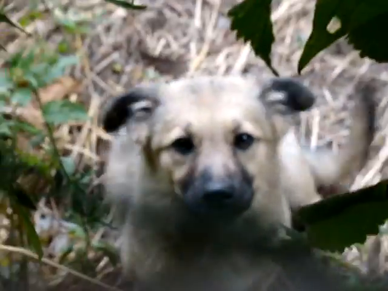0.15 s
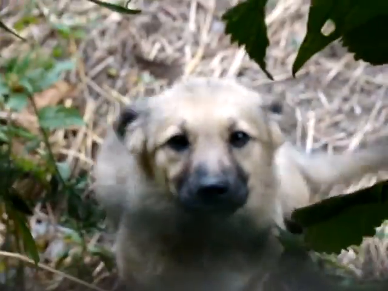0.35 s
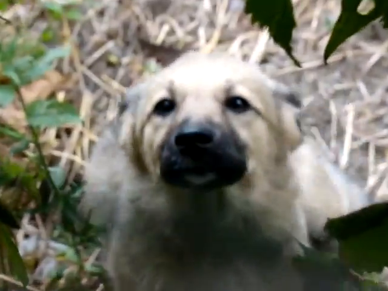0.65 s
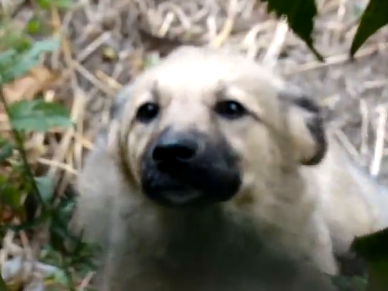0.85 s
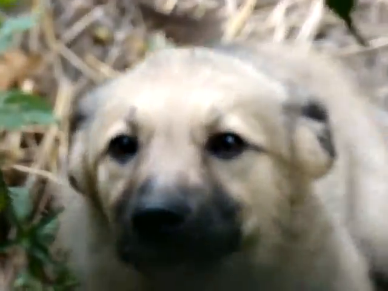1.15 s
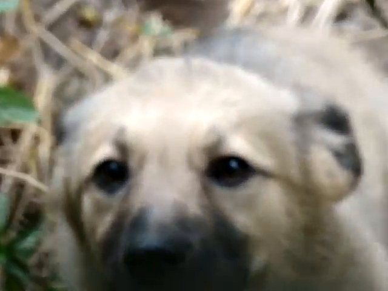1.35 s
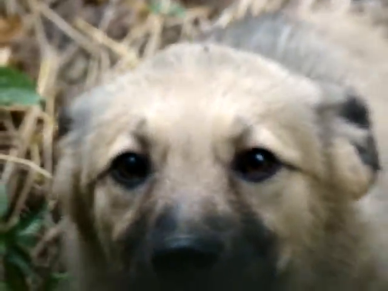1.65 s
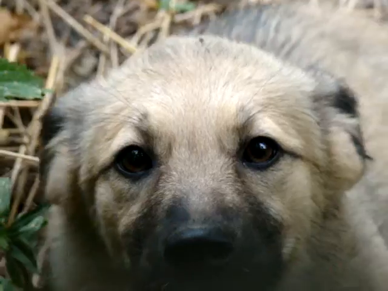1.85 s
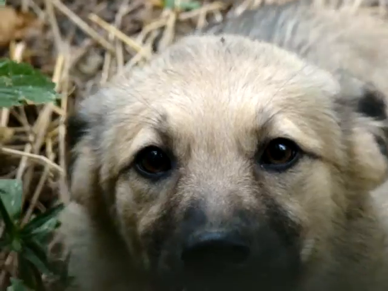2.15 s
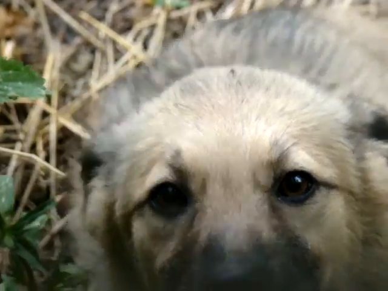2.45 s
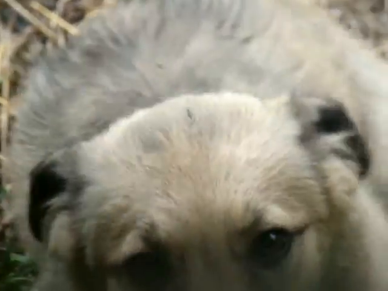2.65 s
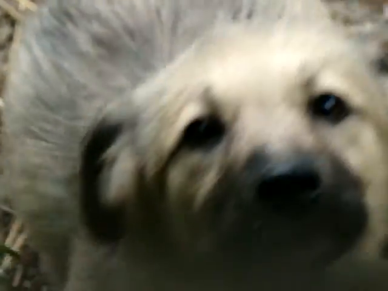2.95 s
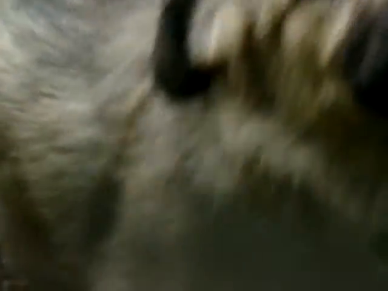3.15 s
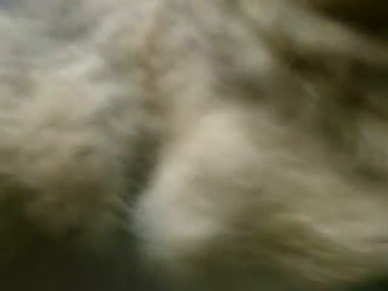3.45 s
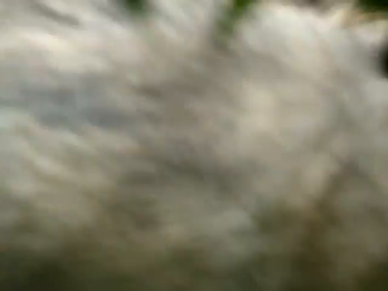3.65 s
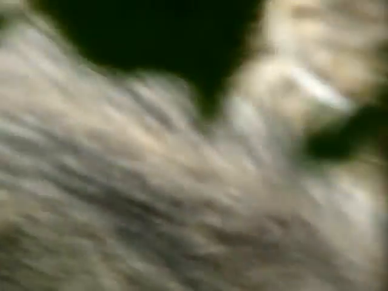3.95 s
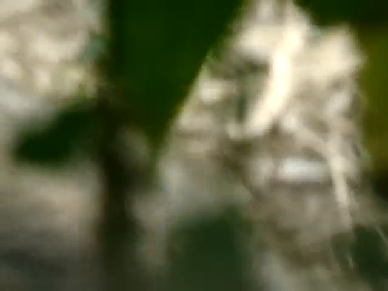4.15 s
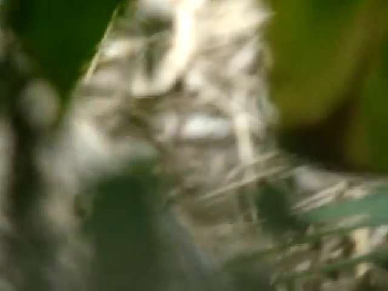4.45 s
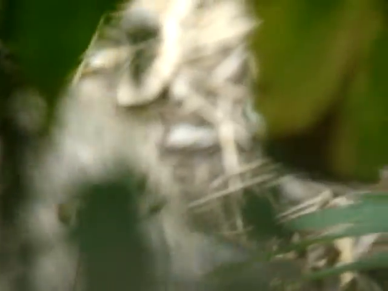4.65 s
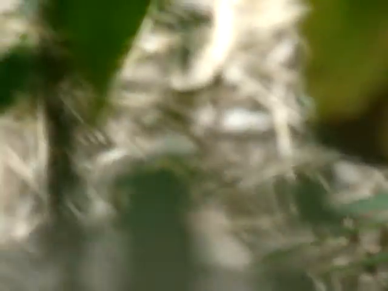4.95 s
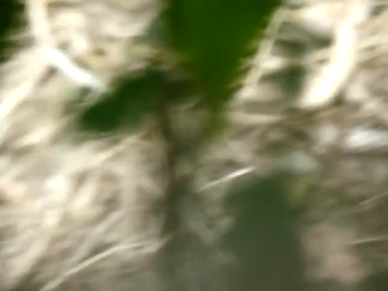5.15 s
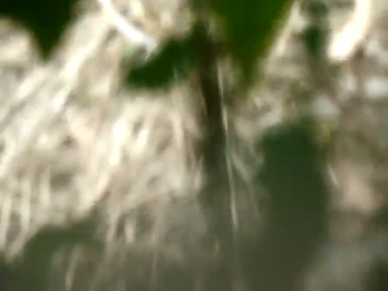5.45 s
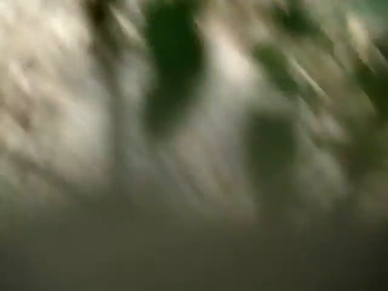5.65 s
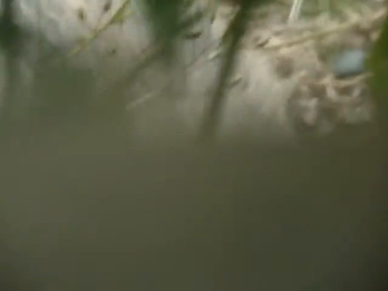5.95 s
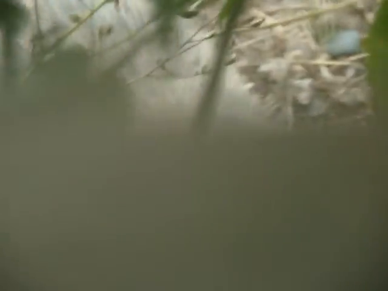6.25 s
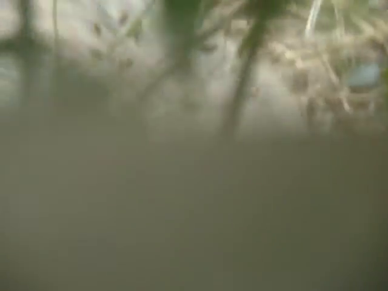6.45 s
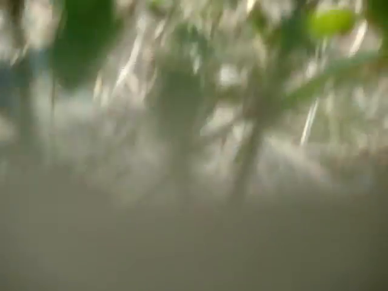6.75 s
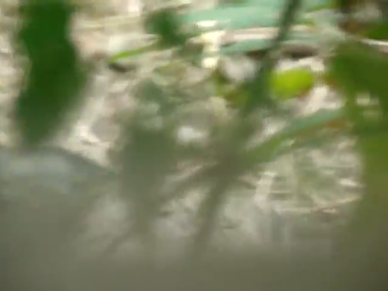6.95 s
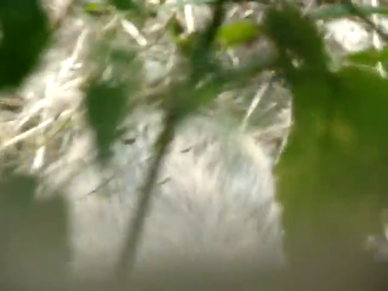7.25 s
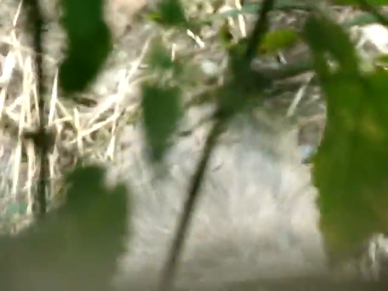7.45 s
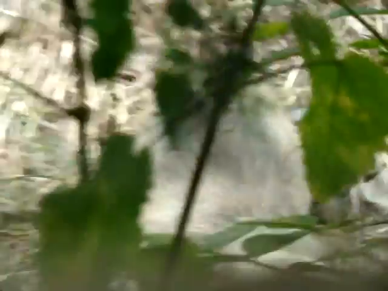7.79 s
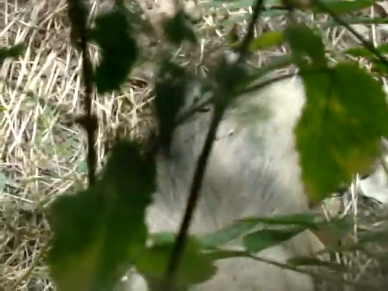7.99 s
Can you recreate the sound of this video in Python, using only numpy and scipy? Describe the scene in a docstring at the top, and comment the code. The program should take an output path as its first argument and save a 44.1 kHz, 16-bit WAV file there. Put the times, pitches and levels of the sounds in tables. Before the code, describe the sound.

A puppy whimpers in thin, very high nose whistles, then a brief voiced whine, amid knocks, dry straw crackle, far chirps and soft hiss.

```python
"""Outdoors, a hand-held microphone close to a puppy in dry straw under low bushes.
Coloured noise gives a soft hiss and rush; damped tones and noise bursts give knocks and straw crackles.
Far birds chirp in sliding tones. From about one second thin nose whistles beat, fray and break over air noise.
After three seconds they drop into a voiced whine of harmonics, with dull rustles from here on.
Knocks, straw and chirps carry on to the end, where a faint distant tone sounds once."""
import sys
import numpy as np
from scipy import signal
from scipy.fft import rfft, irfft
from scipy.io import wavfile
from scipy.ndimage import uniform_filter1d

SR = 44100
rng = np.random.default_rng(int(sys.argv[2]) if len(sys.argv) > 2 else 0)


def int16_out(signal):
    """Quantize to a 16-bit WAV file."""
    q = np.round(np.clip(np.atleast_2d(signal).T, -1, 1) * 32767)
    wavfile.write(sys.argv[1], SR, q.astype(np.int16))


N = 358091
TIME = np.arange(N) / SR


def from_db(db):
    """Decibels to gain."""
    return 10 ** (np.asarray(db) / 20)


def rms_one(x):
    """Scale to unit rms."""
    return x / np.sqrt(np.mean(x ** 2) + 1e-20)


def read(rows, t):
    """Each column of a curve at the times t."""
    s, *columns = np.transpose(rows)
    return [np.interp(t, s, column) for column in columns]


def add(out, s, sound):
    """Mix a sound in from time s."""
    i = max(0, int(s * SR))
    out[i:i + len(sound)] += sound[:max(0, N - i)]


def lowpass(x, order, cutoff_hz):
    """Causal low-pass."""
    return signal.sosfilt(signal.butter(order, cutoff_hz, fs=SR, output="sos"), x)


def band(x, low_hz, high_hz):
    """Causal band-pass."""
    edges_hz = [low_hz, min(high_hz, .45 * SR)]
    return signal.sosfilt(signal.butter(2, edges_hz, "band", fs=SR, output="sos"), x)


def wander(rate_hz, size):
    """Smooth random drift of about unit spread, no faster than the rate."""
    slow = lowpass(rng.standard_normal(size + SR), 2, rate_hz)
    return rms_one(slow[SR // 2:])[-size:]   # the filter's start-up is dropped


def noise(spectrum, size):
    """Noise of a given colour, rms 1, falling away below its first frequency."""
    hz, db = np.transpose(spectrum)
    f = np.maximum(np.fft.rfftfreq(size, 1 / SR), 1)
    gain = from_db(np.interp(np.log(f), np.log(hz), db))
    gain = gain * np.minimum(f / hz[0], 1) ** 2
    return rms_one(irfft(rfft(rng.standard_normal(size)) * gain, size))


def turn(hz):
    """Running phase of a moving frequency."""
    return 2 * np.pi * np.cumsum(hz) / SR


def gate(t, edge_s):
    """Opens at the start of t and shuts at its end."""
    return np.clip(np.minimum(t - t[0], t[-1] - t) / edge_s, 0, 1)


def soften(x, length_s):
    """Round the corners of a control."""
    return uniform_filter1d(x, max(1, int(length_s * SR)), mode="nearest")


def haze(phase, width_hz):
    """A narrow band of noise that follows a moving tone; as strong as a unit sine."""
    in_step = wander(width_hz / 2, len(phase)) * np.sin(phase)
    quarter_off = wander(width_hz / 2, len(phase)) * np.cos(phase)
    return (in_step + quarter_off) / np.sqrt(2)


# Colour of the open air around the microphone. Each row: frequency in Hz, relative density in dB per Hz.
OUTDOOR_COLOUR = [(55, -16.5), (100, -18), (135, -11.5), (230, -4), (1190, -7.5), (1990, -10.5), (3240, -1),
                  (4670, -2.5), (5600, -7.5), (10200, -16.5), (13300, -59)]


def outdoors(split_hz=2200, rush_db=-52.5, hiss_db=-52):
    """A low distant rush and the slightly flickering hiss of leaves, split from one coloured noise."""
    air = noise(OUTDOOR_COLOUR, N)
    low = signal.sosfiltfilt(signal.butter(3, split_hz, fs=SR, output="sos"), air)
    flicker_db = .8 * wander(12, N)
    rush = rms_one(low) * from_db(rush_db)
    hiss = rms_one(air - low) * from_db(hiss_db + flicker_db)
    return rush + hiss


# Colour of dry straw, close by. Each row: frequency in Hz, relative density in dB per Hz.
STRAW_COLOUR = [(1500, -18.5), (4500, -4.5), (6000, -6.5), (8000, 4), (10000, -5.5)]
# Fine crackle of straw around the puppy. Each row: time in seconds, level in dB.
STIRRING_LEVEL = [(.65, -59), (.8, -54), (2.15, -60), (2.3, -53), (5.05, -54), (5.6, -56), (6.4, -70),
                  (6.6, -55), (8.1, -56.5)]


def stirring_straw(grain_db=3, spurt_db=3):
    """Fine stalks crackle in small spurts as the puppy shifts about: noise of grainy level."""
    level_db, = read(STIRRING_LEVEL, TIME)
    ragged_db = grain_db * wander(500, N) + spurt_db * wander(22, N)
    return from_db(level_db) * rms_one(noise(STRAW_COLOUR, N) * from_db(ragged_db))


# Knocks of twigs and fingers close to the microphone. Each row: start in seconds, body peak in dB,
# body pitch in Hz, crack peak in dB, looseness from 0 to 1.
KNOCK_EVENTS = [(0.013, -30.5, 900, -28.5, 1), (0.1365, -30, 460, -68, 0.6), (0.311, -28.5, 525, -54, 0.86),
                (0.4, -25, 1480, -18.5, 1), (0.547, -31.5, 666, -32.5, 0.65),
                (0.6863, -33.5, 432, -36, 0.9), (3.097, -33.5, 400, -42, 0.95),
                (4.0505, -32, 435, -26, 0.7), (4.112, -35.5, 402, -40, 0.37),
                (4.15, -34.5, 390, -32.5, 0.63), (4.356, -32.5, 385, -32, 0.75),
                (4.428, -31.5, 1490, -29, 0.8), (4.8502, -29.5, 1500, -18, 1), (5.256, -33, 620, -42, 0.4),
                (7.0115, -28.5, 1250, -24.5, 0.1), (7.0146, -29.5, 766, -45, 0.75),
                (7.3801, -19, 850, -29, 0.53), (7.3828, -28, 900, -30.5, 0.53),
                (7.7864, -32.5, 706, -43, 0.4), (7.852, -27.5, 720, -32, 0.35),
                (7.894, -31.5, 676, -50, 0.4), (8.057, -32, 746, -46, 0.34)]
# Colour of a twig's crack. Each row: frequency in Hz, relative density in dB per Hz.
TWIG_COLOUR = [(2800, -12), (4700, 5.5), (6000, -7.5), (8000, -3), (10000, -6.5)]
# the duller and looser a knock, the more it thumps the microphone housing
THUMP_HZ, THUMP_S, THUMP_SHARE, SOFT_BODY_HZ = 255, 0.0085, 0.4, 420
THUMP_BAND_HZ = 140, 410


def knocks(cycles=1.0, grit=0.67, tail_s=0.0092, tail_share=0.38, crack_s=0.0038):
    """A blow swings a heavily damped body about once and rattles if it is loose, under a bright crack."""
    out, t = np.zeros(N), np.arange(SR // 20) / SR
    thump = band(np.sin(2 * np.pi * THUMP_HZ * t) * np.exp(-t / THUMP_S), *THUMP_BAND_HZ)
    for s, body_db, hz, crack_db, loose in KNOCK_EVENTS:
        rattle = loose * rms_one(band(rng.standard_normal(len(t)), .5 * hz, 3 * hz))
        swing = (np.sin(2 * np.pi * hz * t) + grit * rattle) * np.exp(-t * hz / cycles)
        rattling_tail = tail_share * rattle * np.exp(-t / tail_s)
        body = band(swing + rattling_tail, .5 * hz, 2170)
        body = body / np.abs(body).max() + THUMP_SHARE * loose * (SOFT_BODY_HZ / hz) ** 2 * thump
        crack = noise(TWIG_COLOUR, len(t)) * np.exp(-t / crack_s)
        add(out, s, from_db(body_db) * body / np.abs(body).max())
        add(out, s, from_db(crack_db) * crack / np.abs(crack).max())
    return out


# A far bird's rising chirps. Each row: start in seconds, level in dB, turning pitch in Hz.
RISING_CHIRPS = [(.165, -52, 5450), (.904, -45.5, 5500), (2.27, -49.5, 5490), (4.14, -51.5, 5400),
                 (4.71, -48.5, 5480), (5.206, -42.5, 5660), (6.178, -46, 5580), (6.816, -45.5, 5540),
                 (7.385, -42.5, 5500), (8.01, -47, 5320)]
# A second bird's lower, falling chirps. Each row: start in seconds, level in dB, turning pitch in Hz.
FALLING_CHIRPS = [(.535, -51.5, 3330), (2.316, -46, 3080)]
# chirps are ragged in pitch and level, and scatter briefly
CHIRP_TRILL_HZ, CHIRP_GRAIN_DB, SCATTER_S = 150, 4, .03


def bird(chirps, slide_hz, length_s, arch, swell_db, echo_share=0.81):
    """Short slurs slide to a turning pitch and bend back, smeared by scattering among the trees."""
    out, t = np.zeros(N), np.arange(0, length_s, 1 / SR)
    tail, progress = np.arange(SR // 6) / SR, t / length_s
    for s, db, turning_hz in chirps:
        hz = turning_hz - slide_hz * (1 - np.sin(arch * progress))
        hz = hz + CHIRP_TRILL_HZ * wander(356, len(t))
        level_db = db + swell_db * (progress - .5) + CHIRP_GRAIN_DB * wander(200, len(t))
        call = from_db(level_db) * np.sin(turn(hz)) * gate(t, 0.003)
        scatter = rng.standard_normal(len(tail)) * np.exp(-tail / SCATTER_S)
        add(out, s, call)
        add(out, s, echo_share * signal.fftconvolve(call, scatter / np.linalg.norm(scatter)))
    return out


# Dry straw crushed underfoot, close by. Each row: start in seconds, peak in dB, rise in seconds.
CRACKLE_EVENTS = [(0.583, -28, 0.0049), (4.2583, -26.5, 0.0011), (4.518, -32, 0.0022),
                  (4.674, -26, 0.00088), (4.773, -23, 0.003), (5.022, -25, 0.0035), (6.575, -34.5, 0.009)]


def crackles(grain_db=4):
    """Several stalks give way within a few milliseconds: a ragged noise burst that rises and dies."""
    out, t = np.zeros(N), np.arange(SR // 16) / SR
    for s, db, rise_s in CRACKLE_EVENTS:
        grain = from_db(grain_db * wander(1100, len(t)))
        burst = noise(STRAW_COLOUR, len(t)) * grain * t * np.exp(-t / rise_s)
        add(out, s, from_db(db) * burst / np.abs(burst).max())
    return out


SQUEAK_EDGE_DB = 8.5   # a squeak starts and ends this far under its peak
SQUEAK_FLUTTER = 0.17   # added flutter of a squeak, which is too brief to settle


def squeak(s, length_s, first_hz, last_hz, db, peak_share):
    """A straight slide that swells to its peak and fades, as points of (s, Hz, dB)."""
    shares = (0, np.clip(peak_share, .02, .98), 1)
    drops_db = (SQUEAK_EDGE_DB, 0, SQUEAK_EDGE_DB)
    return [(s + share * length_s, first_hz + share * (last_hz - first_hz), db - drop)
            for share, drop in zip(shares, drops_db)]


# flutter (0-1) of a held whistle; it grows when the pitch slides and when the jet is weak
FLUTTER_HELD, FLUTTER_SLIDING, SLIDE_HZ_PER_S = 0.28, 0.31, 6600
FLUTTER_PER_DB, FIRM_JET_DB = 0.06, -22.5


def unsteadiness(hz, db):
    """Flutter of the jet from the speed of its slide and from its weakness."""
    slide = np.abs(np.gradient(soften(hz, 0.02))) * SR
    from_slide = FLUTTER_SLIDING * np.tanh(slide / SLIDE_HZ_PER_S)
    from_weakness = FLUTTER_PER_DB * (FIRM_JET_DB - db)
    return np.clip(FLUTTER_HELD + from_slide + from_weakness, 0, 1)


# a jet weaker than about this level frays; the weakest gives up twice FRAY_SHARE of its power
FRAY_DB, FRAY_RANGE_DB, FRAY_SHARE = -33.5, 0.5, 0.37


def fray(tone, phase, db):
    """A weak jet loses its clean tone to a ragged band with wide skirts; its swing limits itself."""
    share = np.clip(FRAY_SHARE / (0.5 + np.exp((db - FRAY_DB) / FRAY_RANGE_DB)), 0, 1)
    ragged = .9 * haze(phase, 160) + .44 * haze(phase, 1100)
    jet = np.sqrt(1 - share) * tone + np.sqrt(share) * ragged
    return rms_one(jet / (soften(jet ** 2, .001) + .1) ** .2)


# The two long nose whistles, close to the microphone. Each row of a whistle: time in seconds,
# pitch in Hz, level in dB.
LONG_WHISTLES = [
    [(1.2, 8000, -37.5), (1.237, 8950, -31.5), (1.32, 8540, -35), (1.335, 8460, -29), (1.406, 8255, -22.5),
     (1.48, 8300, -24.5), (1.575, 8180, -20.5), (1.635, 7890, -26.5), (1.694, 7840, -28)],
    [(2.727, 8260, -29), (2.783, 8080, -27.5), (2.792, 7860, -19.5), (2.85, 7580, -23), (2.89, 7090, -24),
     (2.915, 6930, -25.5), (2.945, 6890, -35), (3.055, 6880, -38), (3.085, 7110, -28.5), (3.178, 7230, -25),
     (3.195, 7480, -27), (3.212, 7240, -24.5), (3.238, 7370, -22), (3.26, 7330, -27.5), (3.296, 7200, -34)],
]
# Short squeaks and faint side whistles. Each row: start in seconds, length in seconds, first pitch in Hz,
# last pitch in Hz, peak in dB, moment of the peak as a share of the length.
SHORT_SQUEAKS = [(0.952, 0.082, 5330, 5450, -48, .6), (0.965, 0.031, 7600, 7520, -36.5, .3),
                 (.999, 0.037, 7500, 6570, -26, 0.2), (1.692, 0.029, 7340, 6930, -34.5, .15),
                 (2.376, 0.18, 6750, 7780, -36.5, 0.72), (2.667, 0.031, 8500, 8520, -34, 0.59),
                 (2.819, .09, 5500, 5600, -42, 0.3), (3.267, 0.055, 5600, 5500, -49, .4),
                 (3.663, 0.017, 9070, 6600, -23.5, 0.31), (3.673, 0.038, 6560, 6580, -30.5, 0.11)]
# Moments when the whistle loses its grip. Each row: start in seconds, length in seconds.
WHISTLE_BREAKS = [(1.324, 0.0069), (1.384, 0.018), (1.5, 0.0033), (2.419, 0.0049), (2.469, 0.0055),
                  (2.517, .008), (2.742, 0.016), (2.77, 0.0079), (2.883, 0.0057), (3.102, 0.0049),
                  (3.251, 0.0026)]


def whistles(jitter_hz=105, beat_hz=240, beat_spread_hz=70, beat_depth=0.91, wobble_db=5, break_db=-24):
    """An air jet sings in the nose; unsteady, it beats between nearby tones, and at set moments it breaks."""
    out = np.zeros(N)
    voices = [(rows, 0) for rows in LONG_WHISTLES]
    voices += [(squeak(*row), SQUEAK_FLUTTER) for row in SHORT_SQUEAKS]
    for rows, unsettled in voices:
        t = np.arange(rows[0][0], rows[-1][0], 1 / SR)
        hz, db = read(rows, t)
        flutter = np.clip(unsteadiness(hz, db) + unsettled, 0, 1)
        phase = turn(soften(hz, 0.0048) + jitter_hz * flutter ** 2 * wander(250, len(t)))
        beat = turn(beat_hz + beat_spread_hz * wander(24.4, len(t)))
        # side tones come in spells, between which they are silent
        above, below = (beat_depth * flutter * np.tanh(np.maximum(wander(25, len(t)) + .5, 0))
                        for side in range(2))
        ripple = .3 * flutter * wander(450, len(t))
        tone = (1 + ripple) * np.sin(phase)
        tone += above * np.sin(phase + beat) + below * np.sin(phase - beat)
        tone /= np.sqrt((1 + above ** 2 + below ** 2 + ripple ** 2) / 2)   # even power
        level_db = db + wobble_db * flutter * np.tanh(wander(83, len(t)))
        add(out, t[0], fray(tone, phase, db) * from_db(level_db) * gate(t, 0.0013))
    broken = sum((TIME > s) & (TIME < s + length) for s, length in WHISTLE_BREAKS)
    return out * soften(soften(from_db(break_db * broken), .001), .001)


# the voiced whine: its pitch sags to its lowest point and climbs back
WHINE_START_S, WHINE_LOWEST_S, WHINE_END_S = 3.266, 3.426, 3.567
WHINE_FIRST_HZ, WHINE_LOWEST_HZ, WHINE_LAST_HZ, SAG_POWER = 1632, 1257, 1473, 2.6
# Pushes of air through the nose. Each row: start in seconds, end in seconds, level in dB.
AIR_PUSHES = [(0.958, 1.025, -45), (1.203, 1.68, -44), (2.398, 2.57, -42.5), (2.6, 3.07, -39.5),
              (3.076, 3.554, -40.5), (3.567, 3.67, -42.5)]
PUSH_ATTACK_S, PUSH_RELEASE_S, PUSH_SAG_DB = 0.019, 0.064, 1   # a push is weaker at its two ends
VOICED_AIR_DB = -4   # during the whine, closed folds let less air through


def airflow():
    """Each push rises, arches gently and dies away."""
    flow = 0
    for start, end, db in AIR_PUSHES:
        off_centre = np.clip(2 * (TIME - start) / (end - start) - 1, -1, 1)
        attack = np.maximum(start - TIME, 0) / PUSH_ATTACK_S
        release = np.maximum(TIME - end, 0) / PUSH_RELEASE_S
        push = np.exp(-attack - release) * from_db(db - PUSH_SAG_DB * off_centre ** 2)
        flow = np.maximum(flow, push)
    voiced = (TIME > WHINE_START_S) & (TIME < WHINE_END_S)
    return flow * soften(from_db(VOICED_AIR_DB * voiced), .02)


# Colour of the breath at the nose. Each row: frequency in Hz, relative density in dB per Hz.
BREATH_COLOUR = [(1500, -26), (2500, -13.5), (4200, -2.5), (7300, -3), (10000, -6.5)]
# Resonances of the nasal passages. Each row: centre in Hz, width in Hz, level in dB against the broad air.
NASAL_RESONANCES = [(3620, 150, -14), (4680, 130, -13), (5400, 200, -12), (6380, 180, -9), (8330, 220, -9)]


def nose_air(swell_db=4.5, gust_db=1, drift=.014):
    """Turbulent air drives the whimper; each nasal resonance drifts, swells and fades in it on its own."""
    air = noise(BREATH_COLOUR, N)
    for hz, width, db in NASAL_RESONANCES:
        ringing = np.sqrt(2) * haze(turn(hz * (1 + drift * wander(3, N))), width)
        air = air + from_db(db + swell_db * np.tanh(wander(8.5, N))) * ringing
    return rms_one(air) * airflow() * from_db(gust_db * wander(25, N))


# Soft rustles of the puppy and the hand in the leaves. Each row: start in seconds, length in seconds,
# level in dB of the dull brushing before it ebbs.
RUSTLE_EVENTS = [(3.262, .045, -47.5), (3.571, 0.34, -54.5), (5.189, 0.47, -53.5), (6.538, 0.25, -52),
                 (7.855, 0.36, -54)]


def rustles(low_hz=300, high_hz=950, grain_db=3, attack_s=0.024, crisp_db=-8):
    """Dull grainy brushing with a little crisp straw on top; it rises quickly and ebbs."""
    out = np.zeros(N)
    for s, length, db in RUSTLE_EVENTS:
        t = np.arange(0, length, 1 / SR)
        brush = rms_one(band(rng.standard_normal(len(t)), low_hz, high_hz))
        brush = brush + from_db(crisp_db) * noise(STRAW_COLOUR, len(t))
        swell = np.minimum(t / attack_s, 1) * np.sqrt(1 - t / length)
        add(out, s, brush * swell * from_db(db + grain_db * wander(60, len(t))))
    return out


# Resonances of the muzzle. Each row: centre in Hz, width in Hz, relative gain in dB.
MUZZLE_RESONANCES = [(2613, 88, 0.5), (3150, 360, -1), (4195, 630, 3), (5084, 320, 6.5), (6360, 280, -1),
                     (7700, 380, -7), (8470, 520, 3)]
THROAT_HZ, THROAT_WIDTH_HZ = 1323, 75   # the fundamental blooms as it slides through this resonance
HOLLOW_DEPTH, HOLLOW_WIDTH_HZ = 0.57, 6   # the fundamental thins out at the very bottom of the sag
WHINE_JITTER, WHINE_SHIMMER, WHINE_FLUTTER_DB = .0035, .24, 2.4   # once settled
WHINE_TIRING_DB_PER_S = 3   # the overtones fade as the whine goes on, this fast times their number
CATCH_JITTER, CATCH_S = 0.029, 0.041   # the vocal folds are rough until they settle
LET_GO_S = 0.016   # the folds turn rough and fade as they part


def whine(waver=0.0073, valley_db=-20, fundamental_db=-42, bloom_db=-29, overtones_db=-43):
    """The vocal folds join in: a wavering tone whose overtones flutter and slide through the muzzle."""
    t = np.arange(WHINE_START_S, WHINE_END_S, 1 / SR)
    away = np.interp(t, [WHINE_START_S, WHINE_LOWEST_S, WHINE_END_S], [1, 0, 1])
    rim_hz = np.where(t < WHINE_LOWEST_S, WHINE_FIRST_HZ, WHINE_LAST_HZ)
    hz = WHINE_LOWEST_HZ + (rim_hz - WHINE_LOWEST_HZ) * away ** SAG_POWER
    hz = hz * (1 + waver * away * wander(49, len(t)))
    parting = np.exp((t - t[-1]) / LET_GO_S)
    rough = WHINE_JITTER + CATCH_JITTER * (np.exp(-(t - t[0]) / CATCH_S) + parting)
    phase = turn(hz * (1 + rough * wander(150, len(t))))
    overtones = 0
    for k in range(2, 9):
        peaks = sum(from_db(db) / (1 + ((k * hz - centre) / width * np.sqrt(2)) ** 2) ** 2
                    for centre, width, db in MUZZLE_RESONANCES)
        tiring_db = WHINE_TIRING_DB_PER_S * k * (t - WHINE_LOWEST_S)
        gain = (from_db(valley_db) + peaks) * from_db(WHINE_FLUTTER_DB * wander(47, len(t)) - tiring_db)
        overtones = overtones + gain * (np.sin(k * phase) + WHINE_SHIMMER * haze(k * phase, 300))
    bloom = from_db(bloom_db) / (1 + (2 * (hz - THROAT_HZ) / THROAT_WIDTH_HZ) ** 2)
    hollow = 1 - HOLLOW_DEPTH * np.exp(-((hz - WHINE_LOWEST_HZ) / HOLLOW_WIDTH_HZ) ** 2)
    fundamental = (from_db(fundamental_db) + bloom) * hollow
    fundamental = fundamental * from_db(.5 * WHINE_FLUTTER_DB * wander(72, len(t))) * np.sin(phase)
    voice = fundamental + from_db(overtones_db) * overtones
    out = np.zeros(N)
    add(out, t[0], np.sqrt(2) * voice * (1 - .5 * parting) * gate(t, 0.0024))
    return out


def far_tone(start_s=7.86, end_s=7.945, hz=995, level_db=-48):
    """A faint thin tone, slightly unsteady in pitch, sounds briefly in the distance."""
    out, t = np.zeros(N), np.arange(start_s, end_s, 1 / SR)
    tone = np.sin(turn(hz + 12 * wander(40, len(t))))
    add(out, start_s, from_db(level_db) * tone * gate(t, 0.0085))
    return out


def thicket(x, t60_s=.85, wet_db=-15.5, dull_hz=2200):
    """Trunks and leaves send back a faint dull tail: decaying noise convolved with the sound."""
    t = np.arange(SR) / SR
    tail = rng.standard_normal(SR) * from_db(-60 * t / t60_s)
    tail = lowpass(tail / np.linalg.norm(tail), 2, dull_hz)
    return x + from_db(wet_db) * signal.fftconvolve(x, tail)[:N]


def scene():
    """The puppy, knocks and straw near the microphone; birds, a tone and hiss beyond."""
    puppy = whistles() + whine() + nose_air()
    near = puppy + knocks() + crackles() + stirring_straw() + rustles()
    birds = bird(RISING_CHIRPS, slide_hz=400, length_s=0.053, arch=2.3, swell_db=-7)
    birds += bird(FALLING_CHIRPS, slide_hz=-1500, length_s=.062, arch=1.9, swell_db=15)
    return (thicket(near) + birds + far_tone() + outdoors())[None]


CUTOFF_HZ = 10200


def record(dry):
    """A steep elliptic low-pass cuts the top."""
    return signal.sosfilt(signal.ellip(12, .1, 80, CUTOFF_HZ, fs=SR, output="sos"), dry)


dry = scene()
out = record(dry)
int16_out(out)
```